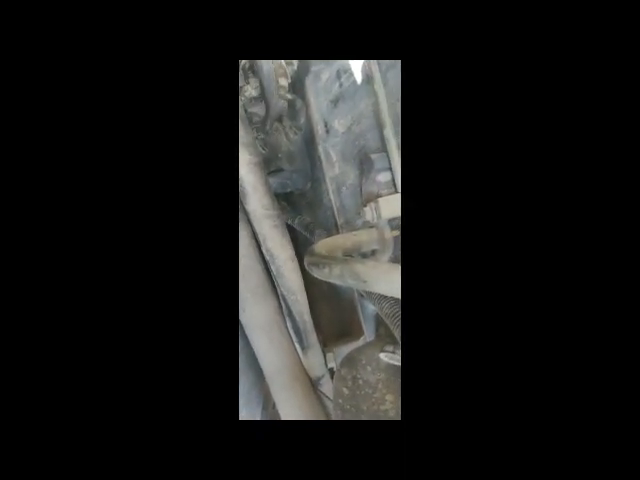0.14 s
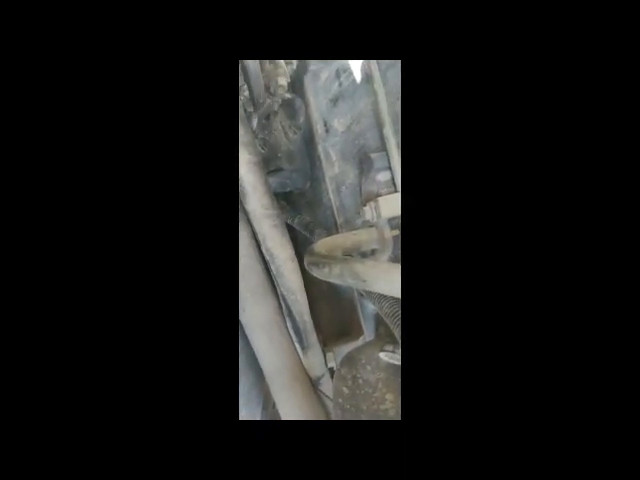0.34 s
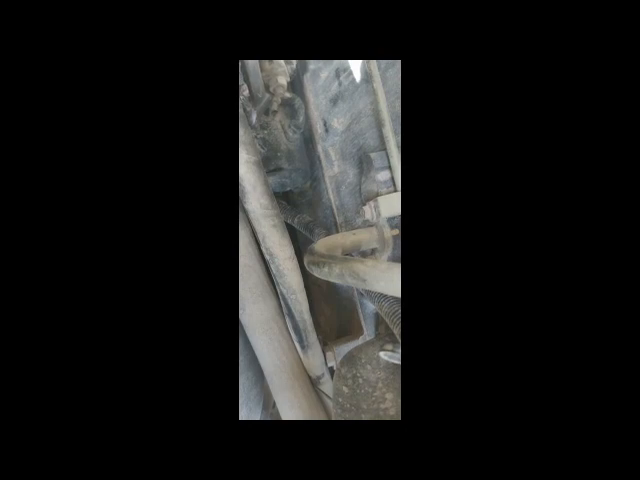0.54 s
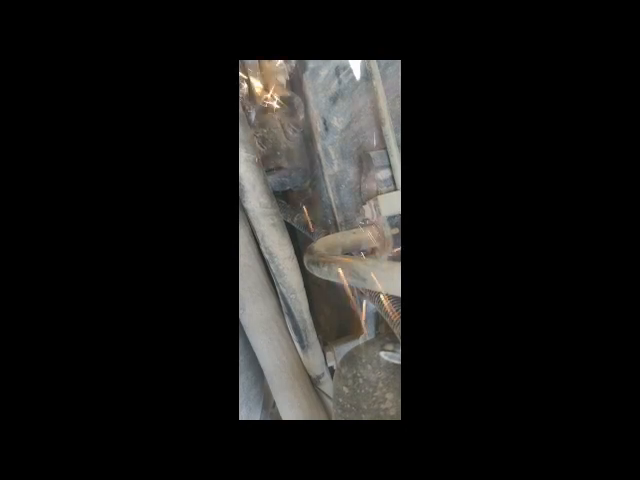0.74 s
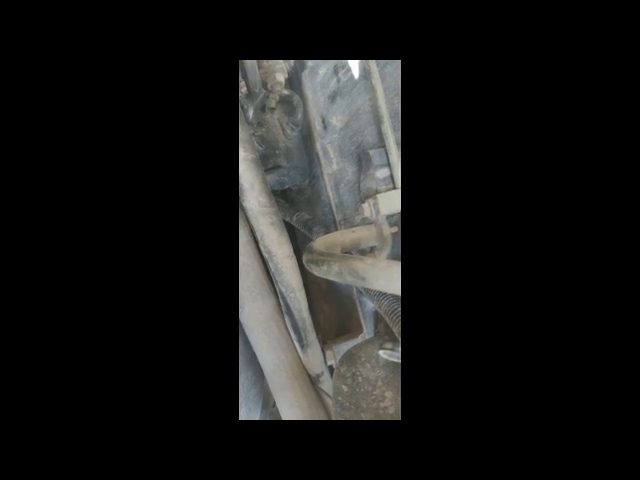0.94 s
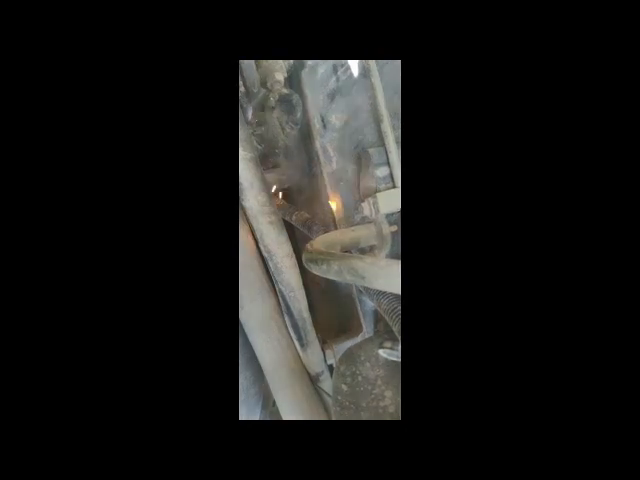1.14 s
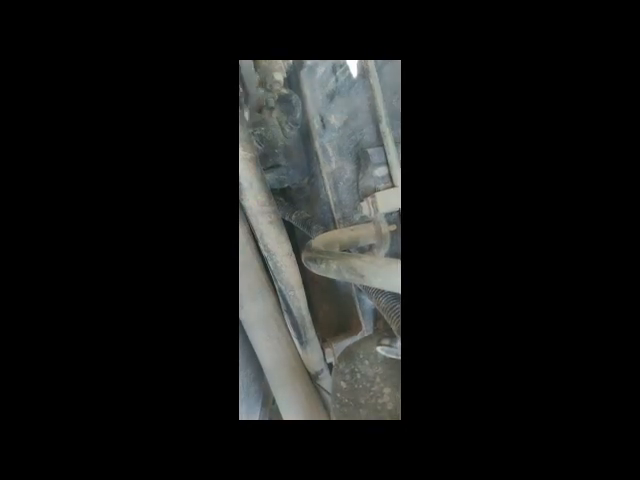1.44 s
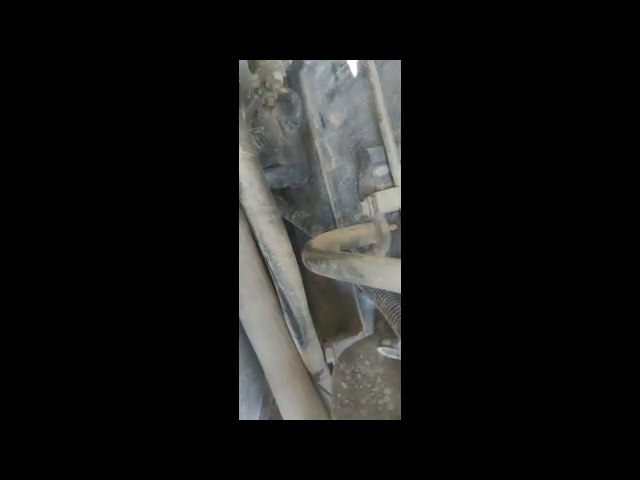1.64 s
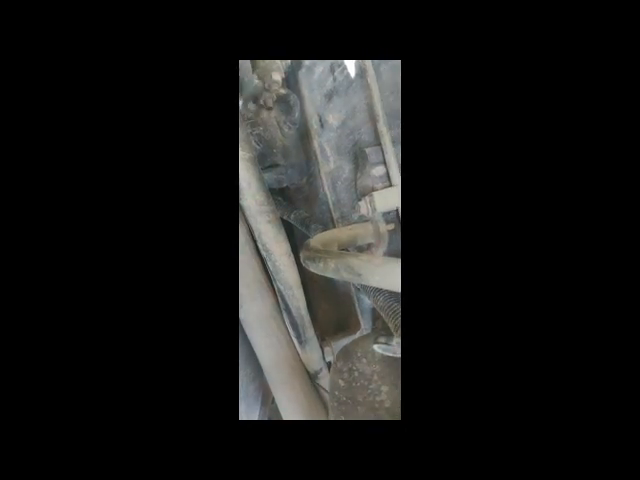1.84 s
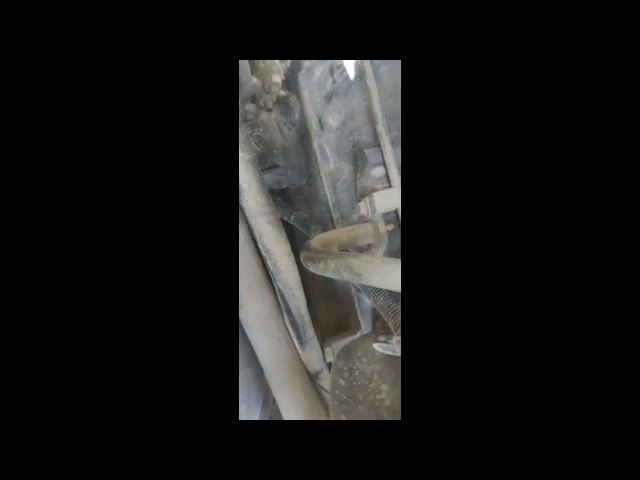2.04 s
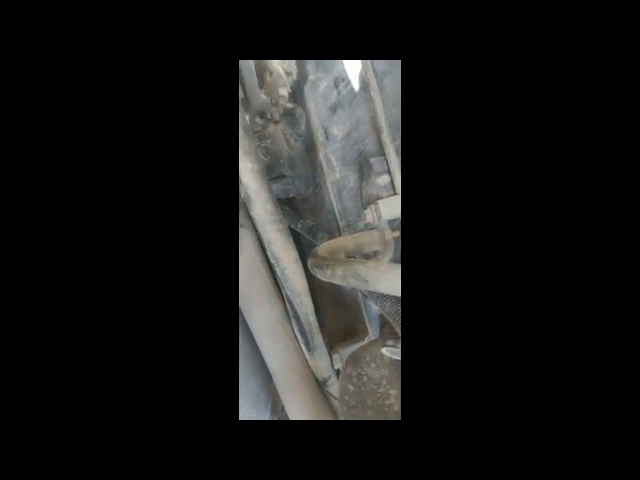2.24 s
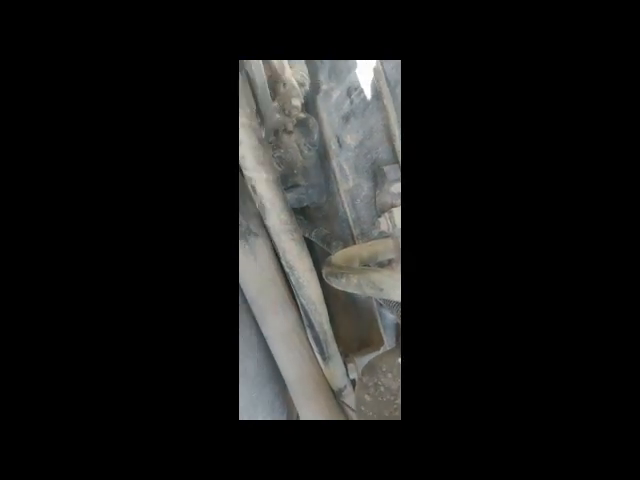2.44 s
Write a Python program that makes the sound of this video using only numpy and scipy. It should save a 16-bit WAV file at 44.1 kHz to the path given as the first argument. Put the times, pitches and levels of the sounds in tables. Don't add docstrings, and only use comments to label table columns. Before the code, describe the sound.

Electrical arcs snap and crackle close up, twice within a third of a second, preceded by clinking metal and a short low shudder, followed by soft knocks, over quiet indoor rumble on a stereo phone.

```python
import sys
import numpy as np
from scipy import signal
from scipy.io import wavfile
from scipy.ndimage import uniform_filter1d

SR = 44100
rng = np.random.default_rng(int(sys.argv[2]) if len(sys.argv) > 2 else 0)


def output_pcm(signal):
    pcm = np.clip(np.atleast_2d(signal).T, -1, 1) * 32767
    wavfile.write(sys.argv[1], SR, np.round(pcm).astype(np.int16))


def volts_from_db(level):
    exponent = np.asarray(level, float) / 20
    return 10 ** exponent


N = 114660
LAG_S = 0.0004


def evened(x):
    return x / np.sqrt(np.mean(x ** 2) + 1e-20)


def read(points, hz):
    f, value = np.transpose(points)
    return np.interp(np.log(hz + 1), np.log(f + 1), value)


def add(mix, s, sound):
    part = mix[..., max(round(s * SR), 0):][..., :sound.shape[-1]]
    part += sound[..., :part.shape[-1]]


def colour(x, db_of):
    gain_db = np.maximum(db_of(abs(np.fft.fftfreq(2048, 1 / SR))), -100)
    minimum_phase = np.exp(np.conj(signal.hilbert(np.log(volts_from_db(gain_db)))))
    taps = np.fft.ifft(minimum_phase).real[:1024]
    taps = taps.reshape((1,) * (x.ndim - 1) + (-1,))
    return signal.fftconvolve(x, taps, axes=-1)[..., :x.shape[-1]]


def tilt(x, slope_db):
    def gain_db(f):
        treble = slope_db * np.log2(np.maximum(f, 1000) / 1000)
        return treble + 12 * np.log2(np.clip(f, 1, 550) / 550)
    return colour(x, gain_db)


def passed(x, order, hz, kind="low"):
    return signal.sosfilt(signal.butter(order, hz, kind, fs=SR, output="sos"), x)


def wander(rate_hz, size):
    t = np.arange(size) / SR
    rates = np.geomspace(rate_hz / 10, rate_hz, 12)
    return evened(sum(np.sin(2 * np.pi * (f * t + rng.random())) / np.sqrt(f) for f in rates))


def resonate(x, hz, width):
    return signal.lfilter(*signal.iirpeak(hz, hz / max(width, 1), SR), x)


# (frequency [Hz], likeness [0 to 1])
SIDE_LIKENESS = [(60, 1), (290, 0.73), (640, 0.55), (1400, 0.14), (8000, .05)]


def wash(spectrum, level, patchy_db):
    frames, hz = N // 512 + 5, np.fft.rfftfreq(2048, 1 / SR)
    a, b, c, d, patches = rng.standard_normal((frames, 1025, 5)).T
    patches = uniform_filter1d(uniform_filter1d(patches, size=6, axis=0), size=6, axis=1)
    same = np.clip(read(SIDE_LIKENESS, hz), -1, 1)[:, None]
    left = a + 1j * b
    right = same * left + np.sqrt(1 - same ** 2) * (c + 1j * d)
    gain = volts_from_db(read(spectrum, hz)[:, None] + patchy_db * evened(patches))
    noise = signal.istft(np.array([left, right]) * gain, nperseg=2048, noverlap=1536)[1][:, :N]
    return evened(noise) * volts_from_db(np.interp(np.arange(N) / SR, *np.transpose(level)))


# (frequency [Hz], level [dB per Hz])
RUMBLE_SPECTRUM = [(22, -31.5), (40, -5), (69, -10.5), (218, -10), (287, -14), (318, -10), (427, -20.5),
                   (549, -23.5), (3000, -59.5), (3900, -100), (6600, -120)]
# (time [s], level [dB])
RUMBLE_LEVEL = [(0.0, -37.5), (0.23, -38.5), (0.38, -37), (0.62, -38.5), (1.01, -40.5), (1.34, -43.5),
                (1.42, -42), (2.6, -43)]


def rumble():
    return wash(RUMBLE_SPECTRUM, RUMBLE_LEVEL, patchy_db=2.5)


# (frequency [Hz], level [dB per Hz])
HISS_SPECTRUM = [(500, 3), (1500, -9.5), (3000, 2.5), (7000, -5.5), (9000, -19.5), (16000, -6.5)]
# (time [s], level [dB])
HISS_LOUDNESS = [(0.0, -74.5), (1.11, -76.5), (1.321, -76.5), (1.56, -88), (1.851, -73), (2.05, -82.5),
                 (2.36, -85.5), (2.6, -81.5)]


def hiss():
    return wash(HISS_SPECTRUM, HISS_LOUDNESS, patchy_db=4)


# (frequency [Hz], level [dB])
HUM_TONES = [(141, -11.5), (282, -2), (423.5, -14)]
# (time [s], pitch [Hz], level [dB rms])
HUM_COURSE = [(0.0, 276, -29), (0.032, 293, -69), (0.05, 280.2, -45), (0.43, 281.6, -38),
              (0.49, 277.4, -40), (0.829, 285.8, -43), (0.848, 283.3, -57), (0.98, 283, -41.5),
              (1.15, 284, -58.5), (1.35, 281.8, -37.5), (1.48, 277.7, -50), (1.59, 281.7, -39.5),
              (1.66, 281.4, -46), (2.53, 283.3, -44.5), (2.591, 275.9, -57), (2.6, 268, -60.5)]
HUM_WOBBLE_DB, HUM_PAN_DB = 2.5, 1
WHINE_HZ, WHINE_DB = 6050, -95


def hum():
    t = np.arange(N) / SR
    s, pitch, level = np.transpose(HUM_COURSE)
    speed = np.interp(t, s, pitch) / HUM_TONES[1][0] + 0.0053 * wander(rate_hz=30, size=N)
    turns = np.cumsum(speed) / SR
    tone = np.zeros(N)
    for hz, db in HUM_TONES:
        wobble_db = HUM_WOBBLE_DB * wander(rate_hz=30, size=N)
        tone += np.sqrt(2) * volts_from_db(db + wobble_db) * np.sin(2 * np.pi * hz * turns)
    whine = volts_from_db(WHINE_DB) * evened(resonate(rng.standard_normal((N, 2)).T, WHINE_HZ, 90))
    pan_db = np.array([[HUM_PAN_DB], [-HUM_PAN_DB]])
    return tone * volts_from_db(np.interp(t, s, level) + pan_db) + whine


# (time of peak [s], level [dB], rise [s], fall
# [s], centre [Hz])
NOISE_SWELLS = [(.002, -66, .01, .02, 2800), (.005, -72, .01, .03, 11000), (.028, -65, .028, .018, 5950),
                (.488, -61, .003, .002, 3800), (.736, -66, .01, .018, 5600), (.748, -62, .02, .04, 1900),
                (.82, -66, .02, .015, 2300), (.833, -61, .008, .002, 4800),
                (1.103, -61, .006, .002, 4000), (1.235, -61, .02, .035, 2330),
                (1.242, -67, .06, .045, 8630), (1.53, -78, .04, .04, 3900), (1.62, -76.5, .07, .1, 6400),
                (1.649, -79.5, .023, .03, 13000), (1.687, -67, .033, .016, 2336),
                (1.79, -74, .035, .02, 11000), (1.805, -57, .05, .04, 1200),
                (1.808, -59, .045, .025, 2000), (1.81, -64, .04, .01, 3400),
                (2.348, -71, .018, .03, 5090), (2.405, -72, .025, .027, 5231),
                (2.47, -81, .046, .04, 6990), (2.595, -64, .034, .04, 2120)]
RUSTLE_OCTAVES, RUSTLE_GRAIN_DB = 0.4, 2


def rustles():
    out, t = np.zeros((2, N)), np.arange(N) / SR
    for s, db, rise, fall, hz in NOISE_SWELLS:
        first = max(round((s - 0.2) * SR), 0)
        u = t[first:first + 17000] - s
        grain_db = RUSTLE_GRAIN_DB * wander(rate_hz=110, size=len(u))
        grain = rng.standard_normal((len(u), 2)).T * volts_from_db(grain_db)
        band = colour(grain, lambda f: -6 * (np.log2((f + 1) / hz) / RUSTLE_OCTAVES) ** 2)
        swell = np.exp(-(u / np.where(u < 0, rise, fall)) ** 2)
        add(out, first / SR, volts_from_db(db) * evened(band) * swell)
    return out


# (time of peak [s], level [dB], half length
# [s], pitch [Hz])
TONE_SWELLS = [
    (0.159, -49, 0.067, 48.6),
    (.29, -39, 0.12, 127.4),
    (.38, -39.5, 0.031, 164.4),
    (.54, -37.5, 0.03, 159),
    (0.766, -29.5, 0.011, 456),
    (1.329, -42.5, 0.024, 51),
    (1.58, -45.5, 0.077, 182.8),
]


def booms():
    out = np.zeros(N)
    for s, db, half, hz in TONE_SWELLS:
        t = np.arange(-half, half, 1 / SR)
        swell = np.cos(np.pi / 2 * t / half)
        add(out, s - half, np.sqrt(2) * volts_from_db(db) * swell * np.sin(2 * np.pi * hz * t))
    return out


# (pitch [Hz], level [dB], time to fall 60 dB [s], rise [s])
CLAMP_TONES = [(620, -8, .04, .003), (740, 3, .02, .0005), (1030, -6, .018, .0005), (1460, 0, .045, .004),
               (2000, -2, .035, .0005), (2560, 1, .025, .001), (2950, -9, .07, .002),
               (3870, 2, .028, .0003), (4120, -6, .03, .001), (4900, -4, .04, .002),
               (5300, -5, .025, .0008), (6850, -4, .055, .001), (10500, -8, .025, .0003),
               (13600, -20, .025, .0003)]
MIDDLE_FROM_HZ, TOP_FROM_HZ = 4400, 6000


def clamp_ring(t):
    groups = np.zeros((3, len(t)))
    for hz, db, t60, rise in CLAMP_TONES:
        group = int(hz > MIDDLE_FROM_HZ) + int(hz > TOP_FROM_HZ)
        start = (1 - np.exp(-t / max(rise, 1 / SR))) ** 2
        groups[group] += volts_from_db(db - 60 * t / t60) * start * np.sin(2 * np.pi * hz * t)
    return groups


# (time [s], level [dB], tilt above 1 kHz [dB per octave], middle tones [dB], top tones [dB])
CLAMP_TAPS = [
    (.2113, -25, 0.5, -1, -17),
    (.229, -49, -2, 5, -2),
    (.2583, -36, -8, -24.5, -23),
    (.4905, -23.5, 1, -1.5, -5.5),
    (1.0105, -37, -9, -16.5, -12),
    (1.8203, -28, -2.5, -14.5, -19),
    (1.842, -37.5, -11, -21.5, -17),
    (1.9205, -27.5, -10, -36, -17),
    (2.0133, -25, -19.5, -38, -50.5),
    (2.021, -40, -17, -41, -37),
]
RATTLE_DB, RATTLE_S, RATTLE_RISE_S = -9, 0.005, 0.00035
SCRATCH_DB, SCRATCH_T60_S, SCRATCH_TOP_HZ = -8, 0.075, 3300
FIZZ_DB, FIZZ_T60_S, FIZZ_TOP_HZ = -10, 0.036, 7000
SPIT_DB, SPIT_T60_S, SPIT_FROM_HZ = -12, 0.02, 5500
BODY_TOP_HZ = 4300


def taps():
    out, t = np.zeros(N), np.arange(6000) / SR
    groups = clamp_ring(t)
    start = np.minimum(t / RATTLE_RISE_S, 1)
    for s, db, slope_db, middle_db, top_db in CLAMP_TAPS:
        g, h, u = rng.standard_normal(len(t)), rng.standard_normal(len(t)), rng.random(len(t))
        rattle = (u < 0.15) * g * start * np.exp(-t / RATTLE_S)
        strike = (t == 0) + volts_from_db(RATTLE_DB) * rattle / np.linalg.norm(rattle)
        body, middle, shine = (signal.fftconvolve(strike, ring)[:len(t)] for ring in groups)
        scratch = start * volts_from_db(SCRATCH_DB - 60 * t / SCRATCH_T60_S) * evened(passed(h, 8, SCRATCH_TOP_HZ))
        fizz_noise = evened(passed(h, 4, [MIDDLE_FROM_HZ, FIZZ_TOP_HZ], "band"))
        fizz = start * volts_from_db(FIZZ_DB - 60 * t / FIZZ_T60_S) * fizz_noise
        spit = start * volts_from_db(SPIT_DB - 60 * t / SPIT_T60_S) * evened(passed(h, 4, SPIT_FROM_HZ, "high"))
        body = passed(tilt(body + scratch, slope_db), 6, BODY_TOP_HZ)
        uneven = volts_from_db(3.4 * evened(uniform_filter1d(g, size=90)))
        bright = volts_from_db(middle_db) * (middle + fizz) + volts_from_db(top_db) * (uneven * shine + spit)
        add(out, s, volts_from_db(db) * (body + bright))
    return out


# (time [s], level [dB], pulse rate [Hz])
GROAN_COURSE = [
    (0.713, -69.5, 150),
    (0.736, -33.5, 149.5),
    (.762, -29, 156.4),
    (0.784, -38.5, 150.7),
    (0.811, -33, 141),
    (.84, -45, 130),
]
# (frequency [Hz], width [Hz], level [dB])
HOUSING_TONES = [(178, 36, 0), (456, 130, 3), (812, 130, -8.5), (1173.5, 270, -23)]
GROAN_JITTER, GROAN_ROUGH = 0.3, 0.6


def groan():
    s, db, rate = np.transpose(GROAN_COURSE)
    t = np.arange(N) / SR
    turns = np.cumsum(np.interp(t, s, rate) * (1 + GROAN_JITTER * wander(rate_hz=110, size=N))) / SR
    pulses = np.diff(np.floor(turns), prepend=0)
    drive = (1 - GROAN_ROUGH) * evened(pulses) + GROAN_ROUGH * rng.standard_normal(N)
    body = np.zeros(N)
    for hz, width, gain_db in HOUSING_TONES:
        body += volts_from_db(gain_db) * evened(resonate(resonate(drive, hz, width), hz, 2 * width))
    return evened(body) * volts_from_db(np.interp(t, s, db, -120, -120))


# (time [s], level [dB], burn time [s], tilt above 1 kHz [dB per octave])
SPARK_SNAPS = [(0.8363, -23, 0.0031, -9.5), (0.8371, -5.5, 0.0042, 2), (0.8447, -11, 0.0044, 5.5),
               (.8495, -30, .017, 2), (0.967, -57, 0.0027, 8), (1.1041, -24.5, .002, 1),
               (1.1062, -20.5, 0.0047, -16), (1.0109, -50.5, 0.0037, 1), (1.1056, -10, 0.0061, 0.5),
               (1.1128, -14, 0.0044, -0.5), (1.118, -28.5, .007, 2.5), (1.1253, -23.5, 0.018, 4.5),
               (1.187, -46, 0.004, -6), (1.3021, -55.5, 0.0078, -3), (1.375, -63, 0.0016, -1.5),
               (1.399, -63.5, 0.0015, -5.5), (1.778, -54, 0.0017, -5), (1.8364, -59.5, 0.0017, -3),
               (2.35, -48, 0.0012, -5), (2.389, -57, .003, -8.5), (2.531, -61.5, 0.0025, -9.5)]
SPARK_RISE_S, SPARK_DROP_DB, SPARK_T60_S = 0.0008, -7.5, 0.0046
CRACKLE_PER_S, CRACKLE_DB = 12000, 4


def sparks():
    out, t = np.zeros(N), np.arange(3000) / SR
    for s, db, burn, slope_db in SPARK_SNAPS:
        u, e, g = rng.random(len(t)), rng.exponential(1, len(t)), rng.standard_normal(len(t))
        clicks = (u < CRACKLE_PER_S / SR) * np.sign(g) * volts_from_db(CRACKLE_DB * np.minimum(e, 3))
        crackle = evened(tilt(evened(clicks + 0.3 * g), slope_db))
        flare = np.minimum(t / SPARK_RISE_S, 1) ** 2
        burning_db = SPARK_DROP_DB * np.minimum(t / burn, 1)
        dying_db = -60 * np.maximum(t - burn, 0) / SPARK_T60_S
        add(out, s - 0.001, volts_from_db(db) * flare * volts_from_db(burning_db + dying_db) * crackle)
    return out


# (time [s], level [dB], length [s])
AIR_POPS = [
    (.8368, -8, .0008),
    (1.1052, -18, .0007),
    (1.1274, -23, .0008),
]
THUMP_HZ, THUMP_DB, THUMP_T60_S = 66.86, -14, 0.064
POP_PAN_DB, THUMP_PAN_DB = -1.5, -4


def pops():
    out, t = np.zeros((2, N)), np.arange(5000) / SR
    thump = volts_from_db(THUMP_DB - 60 * t / THUMP_T60_S) * np.sin(2 * np.pi * THUMP_HZ * t)
    for s, db, length in AIR_POPS:
        u = np.pi * t / length
        push = np.sin(u) * np.exp(-0.3 * u)
        for k, side in enumerate((1, -1)):
            pop = push * volts_from_db(side * POP_PAN_DB) - thump * volts_from_db(side * THUMP_PAN_DB)
            add(out[k], s + LAG_S * (1 - k), volts_from_db(db) * pop)
    return out


# (time [s], level [dB], length [s], from pitch [Hz], to pitch [Hz])
SINGING_ARCS = [
    (.8372, -14, 0.0082, 5400, 4300),
    (.837, -16.5, 0.0032, 10000, 12600),
    (1.1055, -17.5, .006, 7200, 4600),
    (1.1115, -22, .006, 7400, 8400),
    (1.1055, -21, 0.0038, 8600, 14000),
]
ARC_FLUTTER, ARC_FLUTTER_HZ = 0.6, 700


def arcs():
    out = np.zeros(N)
    for s, db, length, from_hz, to_hz in SINGING_ARCS:
        g = rng.standard_normal(600)
        u = np.arange(0, length, 1 / SR) / length
        slow = evened(signal.lfilter(*signal.butter(2, ARC_FLUTTER_HZ, fs=SR), g))[-len(u):]
        turns = np.cumsum(from_hz + (to_hz - from_hz) * u) / SR
        swell = np.sin(np.pi * u) * (1 + ARC_FLUTTER * slow)
        add(out, s, volts_from_db(db) * swell * np.sin(2 * np.pi * turns))
    return out


# (frequency [Hz], time to fall 60 dB [s])
NEAR_DECAY = [(500, 0.098), (1320, 0.1), (3480, 0.075), (9190, 0.013)]
NEAR_DB, FAR_DB, FAR_T60_S, FAR_TOP_HZ = -4, -28, 0.25, 7000


def room(sources, wet_db):
    size = SR // 2
    g = rng.standard_normal((size, 4)).T
    g[:, :60] = 0
    sparse = np.sign(g[:2]) * (abs(g[2:]) > 1.6)
    hz, t, z = signal.stft(sparse, SR, nperseg=128)
    fading = volts_from_db(-60 * t / read(NEAR_DECAY, hz)[:, None])
    near = signal.istft(z * fading, SR, nperseg=128)[1][:, :size]
    far = signal.lfilter(*signal.butter(2, FAR_TOP_HZ, fs=SR), g[2:])
    far = far * volts_from_db(-60 * np.arange(size) / SR / FAR_T60_S)
    tail = volts_from_db(NEAR_DB) * near / np.linalg.norm(near[0]) + volts_from_db(FAR_DB) * far / np.linalg.norm(far[0])
    dry = sources.sum(0)
    wet = (sources * volts_from_db(np.array(wet_db))[:, None]).sum(0)
    direct = np.array([np.roll(dry, round(LAG_S * SR)), dry])
    return direct + signal.fftconvolve(wet[None], tail, axes=1)[:, :N]


def scene():
    background = rumble() + hiss() + hum() + booms()
    metal = taps()
    close = room(np.array([sparks() + arcs(), metal]), wet_db=[0, -2.5]) + pops()
    return background + rustles() + groan() + close


# (frequency [Hz], gain [dB])
LEFT_COLOUR = [(3500, 1.5), (4500, 1.5), (7500, 11.5), (8200, -4.5), (9000, -11), (10000, -18),
               (15000, -38), (16000, -85)]
RIGHT_COLOUR = [(5000, 1.5), (6500, -9), (7500, -20.5), (9000, -12), (9800, 7.5), (12500, 3.5),
                (15000, -4.5), (16000, -56.5)]


def microphones(dry):
    sides = zip(dry, (LEFT_COLOUR, RIGHT_COLOUR))
    return np.array([colour(x, lambda f: read(mic, f)) for x, mic in sides])


def band_limit(x):
    return signal.sosfilt(signal.butter(12, 15960, fs=SR, output="sos"), x)


def record(dry):
    ceiling = 1.2
    held = ceiling * np.tanh(microphones(dry) / ceiling)
    held = passed(held, 4, 38, "high")
    edge = signal.firwin(255, 15600, window=("kaiser", 9), fs=SR)
    mix = signal.oaconvolve(held, edge[None], "same")
    return band_limit(mix)


dry = scene()
out = record(dry)
output_pcm(out)
```